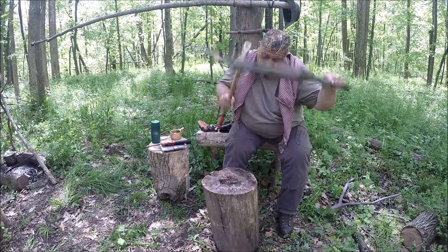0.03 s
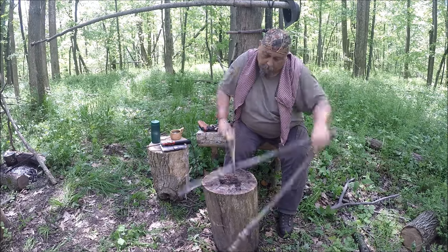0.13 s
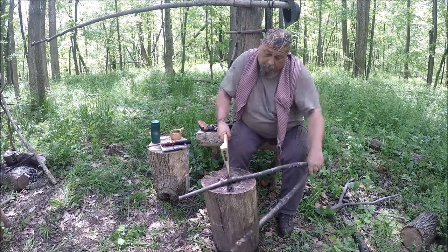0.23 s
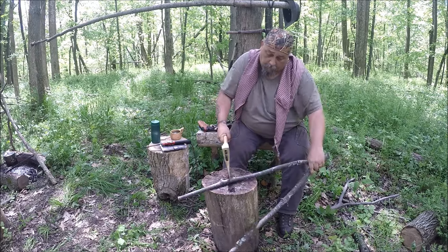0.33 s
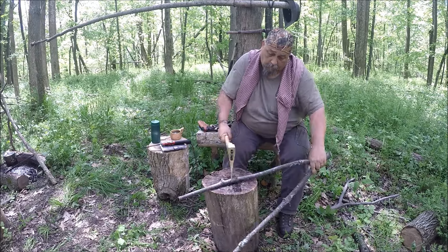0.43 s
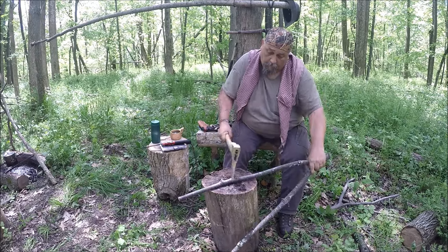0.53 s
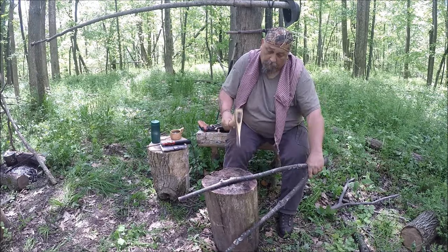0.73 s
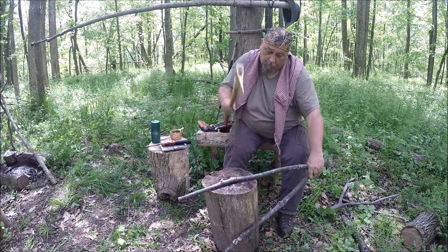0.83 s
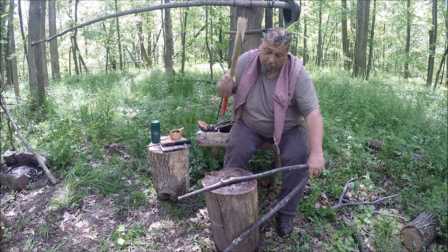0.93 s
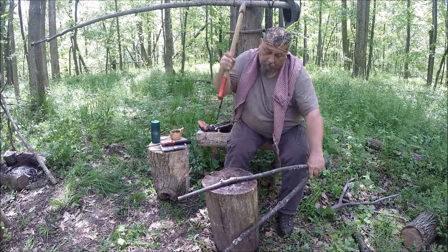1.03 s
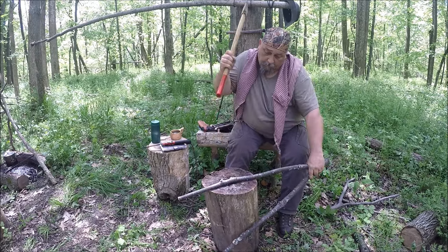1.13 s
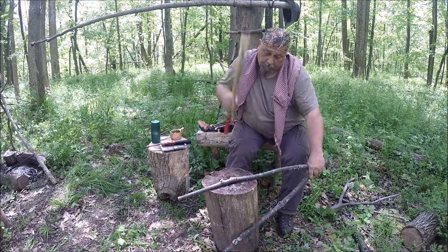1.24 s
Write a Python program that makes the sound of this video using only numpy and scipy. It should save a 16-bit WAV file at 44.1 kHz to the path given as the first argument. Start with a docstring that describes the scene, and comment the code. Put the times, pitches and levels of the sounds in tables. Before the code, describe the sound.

A hatchet chops a dry branch once with a sharp crack, outdoors in the woods.

```python
"""A hatchet strikes a dry branch lying across a stump, once, in open woods.
The impact excites the damped modes of both bodies and splits fibres in bursts of noise; the branch
chatters on the stump and drops back with a hollow knock. Undergrowth and trunks scatter the sound.
Twigs tick, a far bird whistles twice, wind rumbles on the microphone and leaves hiss faintly."""
import sys
import numpy as np
from scipy import signal
from scipy.fft import rfft, irfft, next_fast_len
from scipy.io import wavfile

SR = 44100
rng = np.random.default_rng(int(sys.argv[2]) if len(sys.argv) > 2 else 0)


def transcribe(u):
    """Save the signal u as a 16-bit wav file named by the first command-line argument.

    u: samples, shape (n,) or (channels, n), limited to [-1, 1]; the rate is SR.
    q: integer samples, one column per channel.
    """
    v = np.clip(np.atleast_2d(u).T, -1, 1)
    q = np.round(v * 32767).astype(np.int16)
    wavfile.write(sys.argv[1], SR, q)


N = 57330
T = np.arange(N) / SR
HIT_T = np.arange(N // 6) / SR

# Contacts of blade, branch and stump. Each row: start in seconds, ring level in dB,
# crack level in dB, thud level in dB, low-pass cutoff in Hz.
CONTACT_EVENTS = [(0.202, -25.5, -17.5, -44.5, 7840), (0.2048, -28.5, -20, -38.5, 5500),
                  (0.2085, -20.5, -15, -34, 9080), (0.2160, -32, -23, -34.5, 6120),
                  (0.2225, -21.5, -19.5, -33.5, 3500), (0.2281, -46, -25.5, -30, 1800),
                  (0.2378, -29, -27, -50, 2753), (0.2490, -45.5, -31.5, -48, 1300),
                  (0.277, -50.5, -46.5, -55, 2500), (0.2932, -41.5, -44, -52, 1460),
                  (0.2990, -75, -56, -50, 775)]
# Modes of the branch. Each row: frequency in Hz, level in dB, 60 dB decay time in seconds.
BRANCH_MODES = [(487, -7, .08), (611, -5, .085), (718, -6, .085), (1011, -7, .08), (1161, -3, .08),
                (1213, -6, .08), (1414, -7, .08), (1504, -7, .075), (1614, -6, .075), (2133, -11, .08),
                (2320, -9, .07), (2610, -8, .07), (2815, -7, .05), (2951, -6, .05)]
# Modes of the stump. Each row: frequency in Hz, level in dB, 60 dB decay time in seconds.
STUMP_MODES = [(176, 0.5, 0.063), (211.5, 3.5, 0.075), (255.5, -0.5, 0.09), (382, -5, 0.045)]
# Modes of the splitting wood. Each row: frequency in Hz, level in dB, 60 dB decay time in seconds.
SPLIT_MODES = [(1400, -5.5, 0.012), (2864, 0.5, 0.019)]
# Spectrum of breaking fibres. Each row: frequency in Hz, relative level in dB.
CRACK_SPECTRUM = [(100, -18), (300, -2.5), (700, 0.5), (1400, 7), (2000, -1.5), (2900, -3), (4100, -2),
                  (6000, -15.5), (10000, -25), (16000, -20.5)]
# Spectrum of scatter from ground and undergrowth. Each row: frequency in Hz, relative level in dB.
UNDERGROWTH_SPECTRUM = [(100, -1), (400, 5), (1200, -7), (2800, 1), (4200, 4), (6000, -4), (9000, -16),
                        (16000, -23)]
# Spectrum of the echo from the trunks. Each row: frequency in Hz, relative level in dB.
TRUNK_SPECTRUM = [(100, -7), (300, -5), (700, -0.5), (1300, 0), (2000, -0.5), (3000, 2), (4300, -1),
                  (5400, -6.5), (6500, -17.5), (10000, -25.5), (16000, -34.5)]
# Ticks of twigs and bark, and the hollow knock of the branch dropping back on the stump.
# Each row: start in seconds, level in dB, centre in Hz, width in octaves, 60 dB decay time in seconds.
TICKS_AND_KNOCK = [(0.02, -51, 3440, 0.48, 0.033), (0.1238, -54.5, 3400, 0.64, 0.029),
                   (0.1443, -58.5, 3500, .5, 0.028), (0.2345, -39, 6000, .5, 0.016),
                   (.2372, -40, 5540, 0.3, .012), (.2935, -32.5, 1095, 0.16, 0.029),
                   (0.2953, -42, 3180, 0.58, 0.043), (.2985, -38.5, 690, 0.18, 0.06),
                   (0.4578, -49.5, 8900, 0.12, 0.0068), (0.4693, -52, 9300, 0.28, 0.0056),
                   (.5145, -61.5, 3001, .8, 0.029), (0.541, -62, 4500, .7, 0.025),
                   (0.6893, -46.5, 5170, 0.69, 0.009), (0.6892, -51.5, 3540, 0.15, 0.018),
                   (0.7765, -67.5, 3690, .5, 0.014), (0.9105, -60.5, 1250, 0.24, 0.029),
                   (1.19, -63.5, 2800, 0.96, 0.07)]
# Whistles of the bird. Each row: start in seconds, length in seconds, level in dB.
BIRD_WHISTLES = [(0.577, .16, -65), (0.858, .145, -67.5)]
# Spectrum of wind on the microphone. Each row: frequency in Hz, relative level in dB.
WIND_SPECTRUM = [(10, -16), (22, -11.5), (38, 4), (55, -0.5), (70, 1.5), (86, -12), (120, -25.5),
                 (200, -31.5), (320, -45), (700, -74)]
# Strength of the wind. Each row: time in seconds, relative level in dB.
WIND_GUSTS = [(0, 10.5), (.07, -13.5), (.17, -1.5), (.22, -2.5), (.28, 9.5), (.345, -10.5), (.4, 8.5),
              (.46, -8.5), (.55, 3.5), (.64, -4.5), (.71, 3.5), (.82, -7), (.94, -0.5), (.99, -6),
              (1.08, 1), (1.15, -4), (1.22, 2), (1.3, -2)]
# Dull low bumps. Each row: start in seconds, level in dB, frequency in Hz.
LOW_BUMPS = [(0.504, -35, 105), (0.539, -32, 110), (1.214, -30.5, 108.6)]
# Spectrum of leaves and distant air. Each row: frequency in Hz, relative level in dB.
AIR_SPECTRUM = [(100, -4), (350, 2.5), (700, 1.5), (1400, -5.5), (2600, -5), (4500, -7.5), (7000, -14),
                (11000, -20.5), (16000, -29)]

CRACK_T60_S, SPLINTER_T60_S, SPLINTER_DB = 0.022, 0.089, -12
SPLIT_START_S, SPLIT_DB, EDGE_DB = 0.2088, -11, -20.5
PINNED_S, PINNED_T60_S = 0.245, 0.015
UNDERGROWTH_DB, UNDERGROWTH_T60_S = -24.5, 0.13
TRUNK_DB, TRUNK_T60_S, SCATTER_RISE_S = -26.5, 0.64, 0.049
BIRD_HZ, BIRD_SAG_HZ, BIRD_DROP_HZ = 2570, 80, 460
BIRD_ECHO_DB, BIRD_FADE_DB = -0.5, 3.5
WIND_DB, AIR_DB, AIR_SLOPE_DB_PER_S = -34.5, -65, -3


def hatchet_blow():
    """Impact excitation: each contact rings branch and stump and cracks fibres; soft ones are duller."""
    out = delay(undb(SPLIT_DB) * ring(SPLIT_MODES), SPLIT_START_S)
    branch, stump = ring(BRANCH_MODES), ring(STUMP_MODES)
    for start, ring_db, crack_db, thud_db, cutoff_hz in CONTACT_EVENTS:
        crack = undb(crack_db) * fibre_crack()
        contact = lowpass(undb(ring_db) * branch + crack + undb(thud_db) * stump, cutoff_hz)
        if start < PINNED_S:
            contact += undb(EDGE_DB) * crack  # bright snap of the cutting edge
            time_pinned = np.maximum(start + HIT_T - PINNED_S, 0)
            contact *= fade(PINNED_T60_S, time_pinned)  # the blade pins the branch and damps it
        out += delay(contact, start)
    return out


def fibre_crack():
    """Brittle fracture: splitting fibres release a noise burst with a weaker tail of splintering."""
    envelope = fade(CRACK_T60_S) + undb(SPLINTER_DB) * fade(SPLINTER_T60_S)
    return noise(CRACK_SPECTRUM, len(HIT_T)) * envelope


def woods_echo(x):
    """Reverberation: scatter from the undergrowth dies quickly, that from the trunks slowly."""
    undergrowth = undb(UNDERGROWTH_DB) * scatter(x, UNDERGROWTH_SPECTRUM, UNDERGROWTH_T60_S)
    trunks = undb(TRUNK_DB) * scatter(x, TRUNK_SPECTRUM, TRUNK_T60_S)
    return undergrowth + trunks


def scatter(x, spectrum, t60):
    """Incoherent summation: countless small echoes add in energy, forming a wash of noise."""
    rise = 1 - np.exp(-T / SCATTER_RISE_S)
    energy_response = (rise * fade(t60, T)) ** 2
    energy = convolve(x ** 2, energy_response / energy_response.sum())
    return noise(spectrum) * np.sqrt(np.abs(energy))


def ticks_and_knock(rise_s=0.0004):
    """Damped transients: twigs and bark tick; the branch drops back on the stump with a hollow knock."""
    rise = 1 - np.exp(-HIT_T / rise_s)
    return sum(delay(undb(db) * band(hz, octaves) * rise * fade(t60), start)
               for start, db, hz, octaves, t60 in TICKS_AND_KNOCK)


def bird():
    """Frequency modulation: a pure whistle sags, then drops, blurred by its echo among the trees."""
    whistles = np.zeros(N)
    for start, length, db in BIRD_WHISTLES:
        progress = np.clip((T - start) / length, 0, 1)
        hz = BIRD_HZ - BIRD_SAG_HZ * progress - BIRD_DROP_HZ * progress ** 2.6
        envelope = (4 * progress * (1 - progress)) ** 0.6 * undb(db - BIRD_FADE_DB * progress)
        whistles += envelope * np.sin(2 * np.pi * np.cumsum(hz) / SR)
    echo_response = unit(rng.standard_normal(N) * fade(TRUNK_T60_S, T)) / np.sqrt(N)
    return whistles + undb(BIRD_ECHO_DB) * convolve(whistles, echo_response)


def wind():
    """Turbulence: gusts on the microphone make a low rumble, heard with a few dull bumps."""
    gust_db = np.interp(T, *np.array(WIND_GUSTS).T)
    rumble = noise(WIND_SPECTRUM) * undb(WIND_DB + gust_db)
    bumps = sum(delay(undb(db) * fade(t60=0.078) * np.sin(2 * np.pi * hz * HIT_T), start)
                for start, db, hz in LOW_BUMPS)
    return rumble + lowpass(bumps, hz=217)


def leaves():
    """Ambient noise: leaves and distant air merge into a faint, slowly fading hiss."""
    return noise(AIR_SPECTRUM) * undb(AIR_DB + AIR_SLOPE_DB_PER_S * T)


def ring(modes):
    """Modal superposition: a struck body sounds as a sum of damped sines, here of alternating sign."""
    return sum((-1) ** k * undb(db) * fade(t60) * np.sin(2 * np.pi * hz * HIT_T)
               for k, (hz, db, t60) in enumerate(modes))


def noise(spectrum, size=N):
    """Broadband noise whose spectrum is interpolated over log frequency."""
    hz, db = np.array(spectrum, float).T
    return coloured(lambda f: undb(np.interp(np.log(f), np.log(hz), db)), size)


def band(hz, octaves):
    """Short noise in a Gaussian band over log frequency."""
    return coloured(lambda f: np.exp(-(np.log2(f / hz) / octaves) ** 2 / 2), len(HIT_T))


def coloured(gain_at, size):
    """Spectral shaping: white noise is weighted at each frequency and scaled to rms 1."""
    padded = next_fast_len(size)
    hz = np.maximum(np.fft.rfftfreq(padded, 1 / SR), 1)
    spectrum = rfft(rng.standard_normal(padded)) * gain_at(hz)
    return unit(irfft(spectrum, padded)[:size])


def undb(db):
    """Decibels as an amplitude ratio."""
    return 10 ** (np.asarray(db) / 20)


def unit(x):
    """Normalisation to rms 1."""
    return x / np.sqrt(np.mean(x ** 2))


def fade(t60, t=HIT_T):
    """Exponential decay by 60 dB in t60 seconds."""
    return np.exp(-np.log(1000) * t / t60)


def delay(x, start):
    """Time shift of a short sound to its start in seconds."""
    return np.concatenate([np.zeros(int(start * SR)), x, np.zeros(N)])[:N]


def convolve(x, response):
    """Convolution with an impulse response."""
    return signal.fftconvolve(x, response)[:N]


def lowpass(x, hz):
    """Second-order low-pass filtering."""
    return signal.sosfilt(signal.butter(2, hz, fs=SR, output="sos"), x)


def scene():
    """Superposition: blow, ticks, knock and their echo add to bird, wind and leaves."""
    wood = hatchet_blow() + ticks_and_knock()
    air = leaves()
    return (wood + woods_echo(wood) + bird() + wind() + air)[None]


def record(dry, cutoff_hz=15400):
    """Band limiting: a steep low-pass filter removes the highest treble."""
    return signal.sosfilt(signal.ellip(8, 0.2, 70, cutoff_hz, fs=SR, output="sos"), dry)


dry = scene()
out = record(dry)
transcribe(out)
```